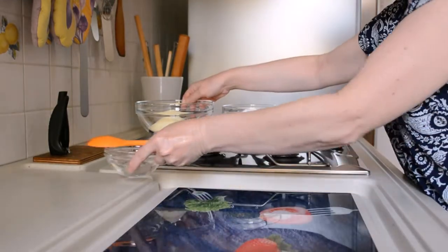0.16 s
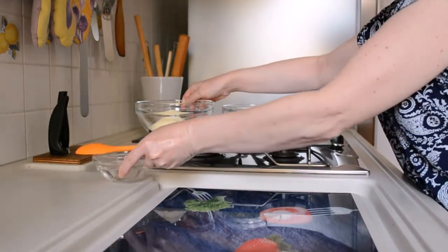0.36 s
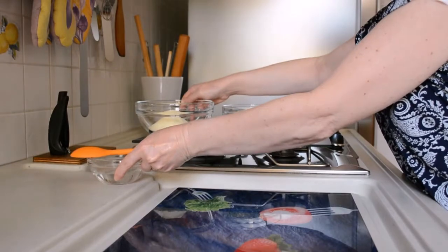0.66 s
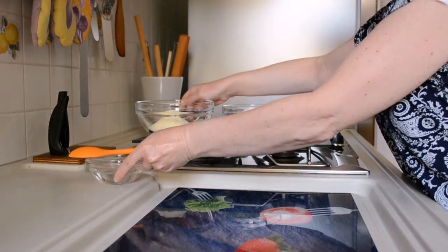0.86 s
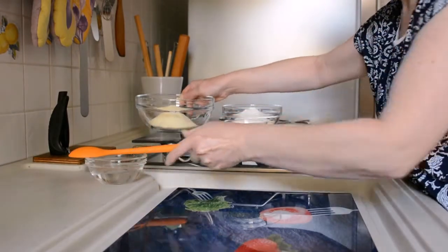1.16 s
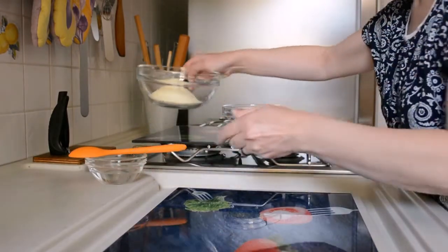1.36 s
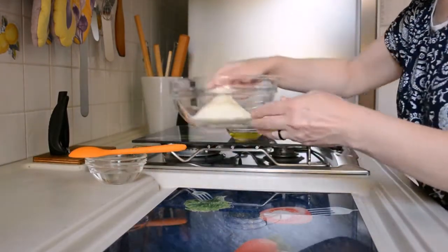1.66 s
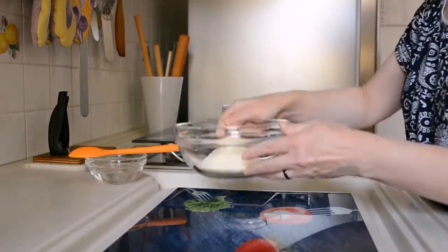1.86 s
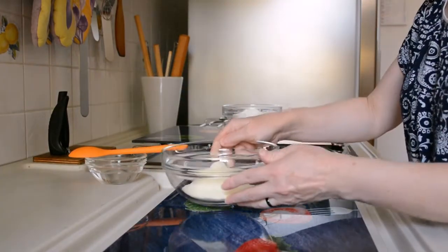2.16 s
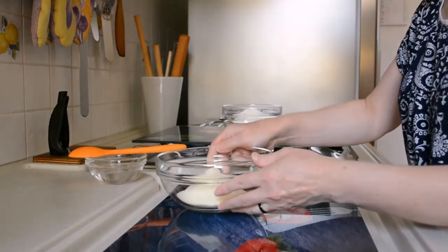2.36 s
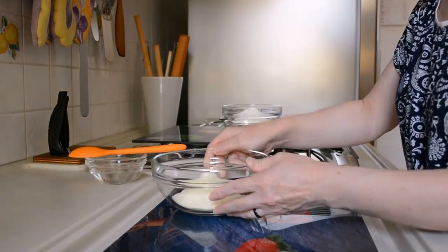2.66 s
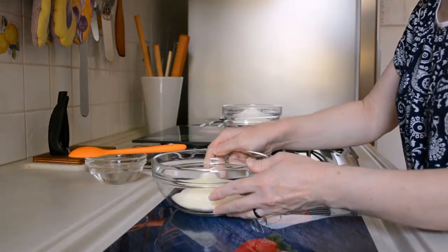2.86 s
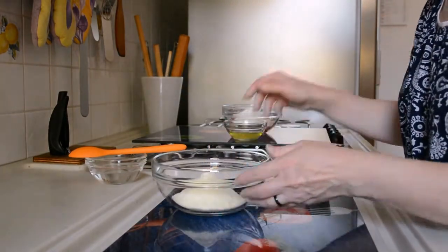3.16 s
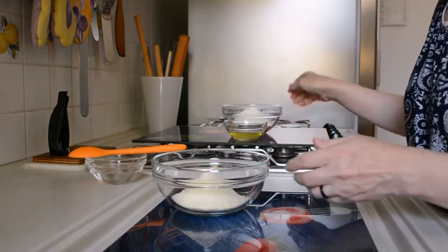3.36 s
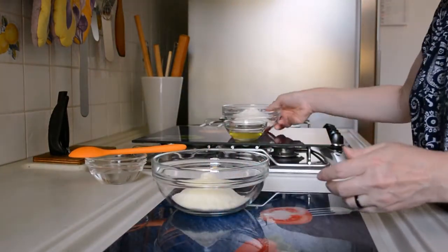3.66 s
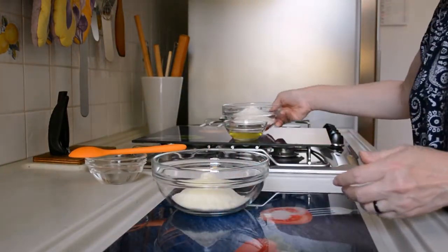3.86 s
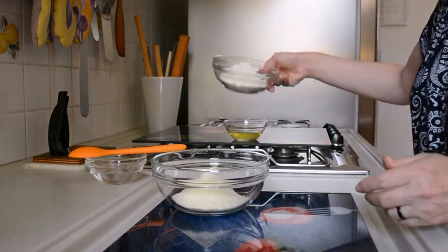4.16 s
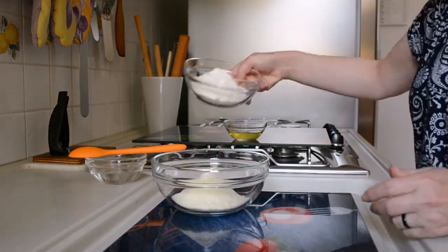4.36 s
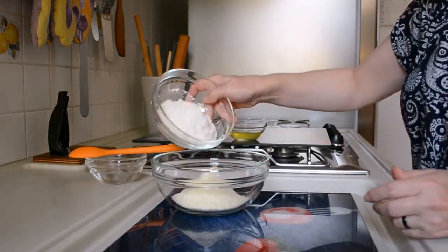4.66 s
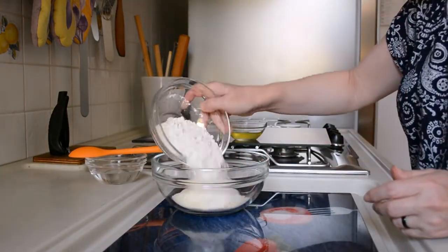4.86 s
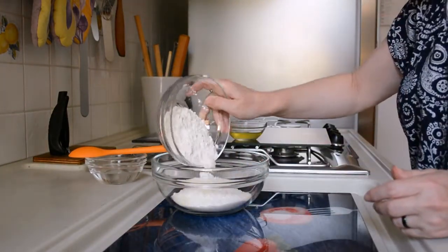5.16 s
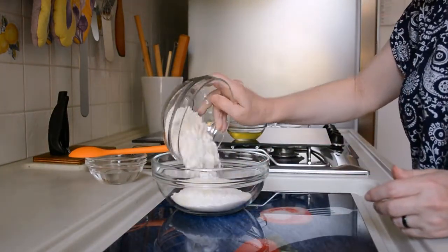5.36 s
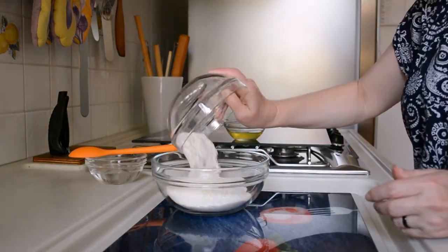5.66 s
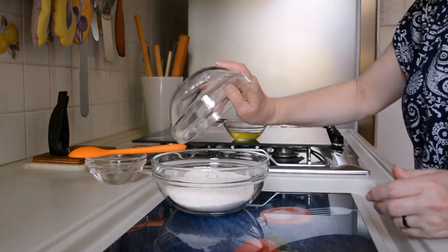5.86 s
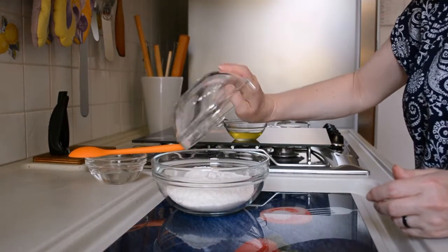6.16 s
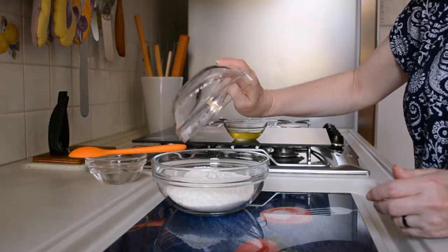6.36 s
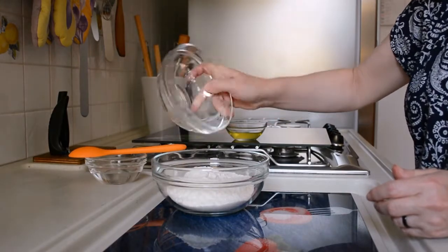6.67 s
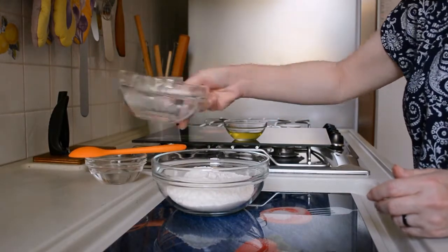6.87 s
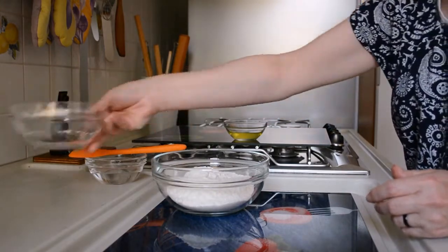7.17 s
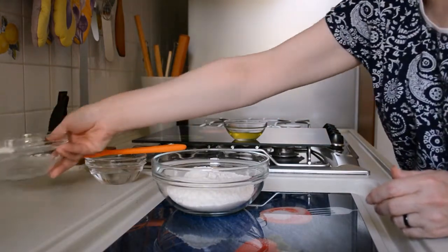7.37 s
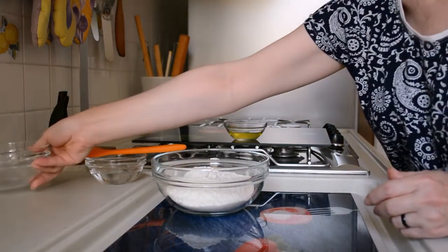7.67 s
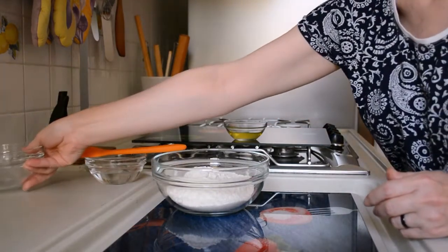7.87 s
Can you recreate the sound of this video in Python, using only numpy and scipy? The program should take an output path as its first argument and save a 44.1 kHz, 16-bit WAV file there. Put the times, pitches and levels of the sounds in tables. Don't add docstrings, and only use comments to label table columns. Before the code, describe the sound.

Close stereo pickup of glass bowls handled in a tiled home kitchen. First come a muted touch and short gritty slide of a small bowl, then the loudest blow as a large bowl meets a glass board, followed by soft settling taps. After a pause, a bright double clink from a ring on glass fades in a short reflective tail, leaving only the soft fridge drone.

```python
import sys
import numpy as np
from scipy import signal
from scipy.fft import rfft, irfft, next_fast_len
from scipy.io import wavfile
from scipy.ndimage import uniform_filter1d, map_coordinates

SR = 44100
rng = np.random.default_rng(int(sys.argv[2]) if len(sys.argv) > 2 else 0)


def amplitude_ratio(level_db):
    exponent = np.asarray(level_db, float) / 20
    return 10 ** exponent


def file_out(sig):
    cols = np.atleast_2d(sig).T
    lim = np.clip(cols, -1, 1)
    pcm = np.round(lim * 32767).astype(np.int16)
    wavfile.write(sys.argv[1], SR, pcm)


N = 352800

# f/Hz, width/Hz, level/dB
WORKTOP_PEAKS = [(373, 118, 3), (670, 300, 1.5), (996, 190, 0), (1560, 400, -5.5), (2220, 2000, -12.5)]
# f/Hz, width/Hz, level/dB
CABINET_PEAKS = [(67.4, 8.5, -6), (174, 54, -4)]
# f/Hz, level/dB per Hz
AIR_COLOUR = [(350, -20), (600, -3.5), (727, -5), (881, -4.5), (1240, -4.5), (2720, -17.5), (2950, -17),
              (4780, -25.5), (14500, -39), (16000, -64)]
# f/Hz, level/dB per Hz
SMALL_RATTLE = [(180, -40), (400, -23), (800, 8), (1600, -1.5), (3000, -17), (5000, -38), (9000, -60),
                (16000, -90)]


def unit(x):
    return x / np.sqrt(np.mean(x ** 2) + 1e-20)


def along(points, hz):
    f, value = np.transpose(points)
    return np.interp(np.log(hz + 1), np.log(f + 1), value)


def wobble(rate):
    coarse = np.arange(0, N + 64, 64)
    knots = rng.standard_normal(int(N * rate / SR) + 4)
    return np.interp(np.arange(N), coarse, map_coordinates(knots, [coarse * rate / SR]))


def filtered(x, response):
    m = next_fast_len(x.shape[-1] + SR // 2)
    spectrum = rfft(x, m) * response(np.fft.rfftfreq(m, 1 / SR))
    return irfft(spectrum, m)[..., :x.shape[-1]]


def resonances(peaks):
    def response(f):
        total = 0
        for k, (centre, width, db) in enumerate(peaks):
            total = total + (-1) ** k * amplitude_ratio(db) * 1j * f * width / (centre ** 2 - f * f + 1j * f * width)
        return total
    return response


def soft(hz):
    return lambda f: 1 / (1 + 1j * f / hz) ** 3


def pair(two, gain, alike):
    def mid_side(f):
        angle = np.arccos(np.clip(along(alike, f), -1, 1)) / 2
        return gain(f) * np.array([np.cos(angle), np.sin(angle)])
    mid, side = filtered(two, mid_side)
    return np.array([mid + side, mid - side])


def rush(gain, patchy_db):
    # f/Hz, likeness
    likeness = [(60, 1), (150, 0.98), (380, 0.99), (950, 0.94), (2380, 0.74), (5980, 0.063), (15000, 0.01)]
    z = signal.stft(rng.standard_normal((2, N)), nperseg=512)[2]
    field = uniform_filter1d(rng.standard_normal(z.shape[1:]), size=5, axis=0)
    field = uniform_filter1d(field, size=14, axis=1)
    noise = signal.istft(z * amplitude_ratio(patchy_db * unit(field)), nperseg=512)[1][:, :N]
    return unit(pair(noise, gain, likeness))


def kitchen(x, wet_db, lag=0.):
    # f/Hz, t60/s
    ring_times = [(100, 0.27), (700, 0.58), (2000, 0.73), (5000, 0.64), (12000, 0.39)]
    # f/Hz, level/dB
    tail_colour = [(200, 9), (800, 5), (3000, 1), (8000, 3.5), (12500, 12.5), (14000, -26)]
    # f/Hz, likeness
    tail_likeness = [(60, 1.0), (380, 1), (950, 0.99), (2380, 0.97), (5980, 0.92), (7500, 0.57),
                     (12000, 0.8)]
    first_echo = 0.0069
    hz, t, z = signal.stft(rng.standard_normal((2, SR)), SR, nperseg=256)
    fading = z * amplitude_ratio(-60 * t / along(ring_times, hz)[:, None])
    tail = signal.istft(fading, SR, nperseg=256)[1][:, :SR]
    tail = tail * np.clip(np.arange(SR) / SR / first_echo - 1, 0, 1)
    tail = pair(tail, lambda f: amplitude_ratio(along(tail_colour, f)), tail_likeness)
    tail = tail / np.linalg.norm(tail[0])
    direct = filtered(x, lambda f: np.exp(-1j * np.pi * f * lag * np.array([[1], [-1]])))
    return direct + amplitude_ratio(wet_db) * signal.fftconvolve(x[None], tail, axes=1)[:, :len(x)]


def hum():
    # t/s, drone level/dB
    load = [(0, -48.5), (1.5, -48), (3.9, -47), (4.7, -47), (6.2, -47), (8, -47.5)]
    # f/Hz, level/dB per Hz
    drone_colour = [(24, -52), (40, -18.5), (87, -19.5), (150, -10), (209, -6.5), (350, 0), (389, 3),
                    (488, -5), (671, -4), (724, -5), (909, -7.5), (1250, -20), (1500, -45), (1950, -18),
                    (3300, -120)]
    # f/Hz, level/dB
    motor_tones = [(49.5, -77.5), (99, -63.5), (100.1, -80)]
    # f/Hz, width/Hz, level/dB
    narrow_bands = [(136.8, 7, -63), (163.7, 13, -62), (342.4, 70, -52), (737.6, 33, -55.5)]
    t = np.arange(N) / SR
    drone_db = np.interp(t, *np.transpose(load))
    air_db = -49 + drone_db - drone_db.mean()
    drone = rush(lambda f: amplitude_ratio(along(drone_colour, f)), patchy_db=0.53)
    out = amplitude_ratio(drone_db + 0.15 * wobble(3.47)) * drone
    air_noise = rush(lambda f: amplitude_ratio(along(AIR_COLOUR, f)), patchy_db=0.94)
    out = out + amplitude_ratio(air_db + 0.19 * wobble(1.3)) * air_noise
    for hz, db in motor_tones:
        tone = np.sin(2 * np.pi * hz * t + 0.39 * wobble(6.2))
        out = out + amplitude_ratio(db + 0.69 * wobble(2.7)) * tone
    for hz, width, db in narrow_bands:
        band = filtered(rng.standard_normal(N), lambda f: 1 / (1 + (2 * (f - hz) / width) ** 2))
        out = out + amplitude_ratio(db + 1.35 * wobble(0.83)) * unit(band)
    return out


def sleeves():
    # middle t/s, length/s, level/dB
    reaches = [
        (0.303, 1, -65),
        (2.1, 0.79, -63),
        (4.1, .4, -66),
    ]
    # f/Hz, level/dB per Hz
    cloth_colour = [(800, -34), (2000, -8), (4000, -3), (6000, -8), (9000, -18), (14000, -24)]
    t = np.arange(N) / SR
    swell = sum(amplitude_ratio(db) * np.exp(-(2 * (t - s) / length) ** 2) for s, length, db in reaches)
    return swell * rush(lambda f: amplitude_ratio(along(cloth_colour, f)), patchy_db=0.5)


def cracks():
    # t/s, peak level/dB
    instants = [
        (.8085, -44),
        (.852, -45),
        (2.062, -56),
        (2.8006, -28),
        (5.204, -40),
    ]
    t60, lower_edge = 0.012, 9000
    out, t = np.zeros(N + SR), np.arange(SR // 10) / SR
    for s, db in instants:
        out[round(s * SR):][:len(t)] += amplitude_ratio(db - 60 * t / t60) * rng.standard_normal(len(t))
    bright = filtered(out[:N], lambda f: (1j * f / (lower_edge + 1j * f)) ** 3)
    return kitchen(bright, wet_db=-11, lag=1e-5)


def slide():
    # peak t/s, peak level/dB, swell/s, fade/dB per s
    shoves = [
        (.862, -33, 0.005, 110),
        (.995, -29.5, 0.052, 92),
        (1.115, -39, .04, 222),
    ]
    # f/Hz, level/dB, t60/s
    singing_modes = [(6934, -36, .05), (10340, -33, 0.055)]
    t = np.arange(2 * SR) / SR
    grains = (rng.random(len(t)) < 600 / SR) * rng.standard_normal(len(t))
    slips = grains + 0.079 * rng.standard_normal(len(t))
    force = 0
    for s, db, swell, fade in shoves:
        below_peak = np.where(t < s, 20 * (s - t) / swell, fade * (t - s))
        force = force + amplitude_ratio(db - below_peak) * (t > s - swell)
    slips = slips * force / slips.std()
    board = filtered(slips, lambda f: soft(hz=3000)(f) * resonances(WORKTOP_PEAKS)(f))
    rim = filtered(slips, resonances([(hz, 1.9 / t60, db + 30) for hz, db, t60 in singing_modes]))
    rim = filtered(rim, lambda f: f > 5500)
    wet = kitchen(amplitude_ratio(12) * board + amplitude_ratio(-12) * rim, wet_db=-8.5)
    return np.pad(wet, [(0, 0), (0, N - len(t))])


def bowl(modes, clatter, base, hits, clatter_db, rattle_s, split_hz, wet_db, pan_db, lag):
    out, t = np.zeros((2, N + SR)), np.arange(SR) / SR
    short = t[:SR // 2]
    hz, level_db, t60 = (column[:, None] for column in np.transpose(modes))

    def thump_response(f):
        no_rumble = (1 - soft(hz=base[0][0] / 4)(f)) ** 2
        return resonances(base)(f) * soft(hz=2500)(f) * no_rumble
    thump = filtered(1. * (t == 0), thump_response)
    thump = thump / np.abs(thump).max()
    rise = (1 - np.exp(-t / 0.000085)) ** 2

    for s, db, hard_db, thump_db in hits:
        chance = rng.random((3, len(modes), 1))
        mode_db = level_db + hard_db * np.log2(hz / 1000) + 3.2 * chance[0]
        fall = amplitude_ratio(mode_db - 60 * short / np.clip(t60, .01, .7))
        beat = 1 + .5 * np.cos(2 * np.pi * (split_hz * (.5 + chance[1]) * short + chance[2]))
        ring = np.sum(fall * beat * np.sin(2 * np.pi * hz * short), axis=0)
        colour = lambda f: amplitude_ratio(along(clatter, f) + hard_db * np.log2((f + 50) / 1000))
        rattle = unit(filtered(rng.standard_normal(SR), colour))
        glass = amplitude_ratio(clatter_db - 60 * t / rattle_s) * rattle
        glass[:len(short)] += ring / np.abs(ring).max()
        radiated = filtered(glass * rise, lambda f: (1j * f / (350 + 1j * f)) ** 3)
        knock = radiated + amplitude_ratio(thump_db) * thump
        out[:, round(s * SR):][:, :SR] += amplitude_ratio(db) * kitchen(knock, wet_db, lag)
    return out[:, :N] * amplitude_ratio([[pan_db / 2], [-pan_db / 2]])


def chips():
    # f/Hz, level/dB, t60/s
    tick_modes = [(9600, -5, .05), (10200, -1, .02), (11300, -7, .025), (12100, 0, .02)]
    # t/s, peak level/dB, hardness/dB per octave, thump/dB
    ticks = [
        (2.062, -54, 0, -51),
        (7.13, -70, 0, -40),
    ]
    return bowl(tick_modes, AIR_COLOUR, WORKTOP_PEAKS, ticks, clatter_db=-21, rattle_s=.05, split_hz=21,
                wet_db=4.0, pan_db=.1, lag=1.2e-5)


def small_bowl_foot():
    # f/Hz, level/dB, t60/s
    foot_modes = [(414, -9, 0.044), (643, -5, .04), (845, 5, 0.032), (930, 4, .03), (1180, 2, 0.033),
                  (1570, -1, 0.052), (1990, -24, 0.016), (2450, -17, .02), (3080, -12, 0.028)]
    # t/s, peak level/dB, hardness/dB per octave, thump/dB
    knocks = [
        (0.852, -15.5, -1, -8),
        (0.968, -34, -4, 2),
        (1.0055, -18.5, -3, -16),
        (1.04, -32.5, -3, 6),
        (1.076, -38, 8, -2),
        (1.109, -34, 0, -8),
    ]
    return bowl(foot_modes, SMALL_RATTLE, WORKTOP_PEAKS, knocks, clatter_db=-6.5, rattle_s=0.078, split_hz=15,
                wet_db=-3.5, pan_db=0.5, lag=.8e-5)


def small_bowl():
    # f/Hz, level/dB, t60/s
    small_modes = [(750, 4, .025), (1150, -3, .03), (1650, -4, .03), (2400, -11, .02), (3241, -5, .02),
                   (4420, -11, .012), (4850, -16, .01), (6934, -33, .05), (10340, -33, .1),
                   (13470, -40, .03)]
    # t/s, peak level/dB, hardness/dB per octave, thump/dB
    touches = [
        (.81, -21, 3, -22),
        (0.8503, -32, 1.5, -20),
    ]
    return bowl(small_modes, SMALL_RATTLE, WORKTOP_PEAKS, touches, clatter_db=-17, rattle_s=0.036, split_hz=19,
                wet_db=-1.5, pan_db=-.3, lag=1.2e-5)


def held_bowl():
    # f/Hz, level/dB, t60/s
    wall_modes = [(890, -6, 0.11), (1064, 12, 0.032), (1280, 5.5, 0.082), (1474, 6, 0.12),
                  (1700, -14, 0.034), (2113, 7, 0.049), (2400, 12, 0.042), (2760, 6.5, 0.045),
                  (3470, 11, 0.087), (3920, 1.5, 0.1), (5000, -7, 0.05), (5190, 13, 0.038),
                  (7360, 2.5, 0.047), (9604, -15.5, 0.086), (10940, -17, 0.07), (11340, -17.5, 0.1),
                  (12120, -32, .08), (13150, -17, 0.1), (13690, -26, 0.11), (14850, -23, .1)]
    rim_hz = [1933, 3483, 5265, 7316]
    # level/dB, t60/s
    rim_rings = [(-2, .2), (-5, 0.7), (-13, 0.4), (-4.5, 0.2)]
    # f/Hz, level/dB per Hz
    held_rattle = [(180, -45), (300, -6), (640, -25.5), (1260, -3.5), (2400, -2.5), (4400, -11),
                   (6300, -29), (8600, -46), (10500, -30.5), (12500, -41), (15500, -62)]
    # t/s, peak level/dB, hardness/dB per octave, thump/dB
    clinks = [
        (5.204, -2.5, 1, -40),
        (5.21, -2, -3.5, -43),
        (5.219, -8, -6, -42),
        (5.274, -12, -8.5, -33),
        (5.565, -39, -5, -38),
    ]
    modes = wall_modes + [(hz, *ring) for hz, ring in zip(rim_hz, rim_rings)]
    return bowl(modes, held_rattle, CABINET_PEAKS, clinks, clatter_db=-9.0, rattle_s=0.031, split_hz=44,
                wet_db=-1.5, pan_db=-0.2, lag=1.4e-5)


def large_bowl():
    # f/Hz, level/dB, t60/s
    large_modes = [(800, -16, 0.055), (892, 6.5, 0.08), (945, 1, .04), (1118, 1, .06), (1200, 1, 0.05),
                   (1330, 9.5, 0.05), (1420, 1, 0.04), (1650, 2, 0.05), (1920, -8, 0.08), (1820, -6, .05),
                   (2430, 1, 0.044), (2567, 1.5, 0.029), (3065, -1, 0.06), (3420, 2.5, 0.05),
                   (3900, -14, 0.035), (4680, -14, .07), (4300, -34, .04), (5420, -18, 0.052),
                   (5320, -17, 0.4), (5480, -16, 0.057), (5600, -18, 0.044), (6230, -12, 0.08),
                   (6640, -13, .05), (7700, -25, .05), (8457, -26, 0.06), (9760, -27, .05),
                   (10900, -33, .05), (11200, -28, .045), (11920, -33, 0.073)]
    # f/Hz, level/dB per Hz
    large_rattle = [(180, -82), (300, -41), (509, -16), (610, -1.5), (740, -26), (1020, 0.5), (1400, -7),
                    (1870, -4), (2250, -6), (3450, -8.5), (5900, -26), (12500, -45), (15500, -80)]
    # t/s, peak level/dB, hardness/dB per octave, thump/dB
    blows = [
        (2.7995, 3, 0.7, -39.5),
        (2.803, -5.5, 0.65, -31.5),
        (2.8093, -2.5, -7, -46),
        (3.082, -23, -5, -27),
        (3.093, -21.5, -6, -35),
        (3.322, -41, 0, -31),
    ]
    return bowl(large_modes, large_rattle, CABINET_PEAKS, blows, clatter_db=-7.5, rattle_s=0.049, split_hz=21,
                wet_db=-2.5, pan_db=0.3, lag=.6e-5)


def scene():
    background = hum() + sleeves()
    contacts = cracks() + slide() + chips()
    bowls = small_bowl_foot() + small_bowl() + held_bowl() + large_bowl()
    return background + contacts + bowls


def top_cut(x):
    return signal.sosfilt(signal.butter(12, 16500, fs=SR, output="sos"), x)


def record(dry):
    full = np.clip(dry, -1, 1)
    mix = filtered(full, lambda f: f < 15750)
    return top_cut(mix)


dry = scene()
out = record(dry)
file_out(out)
```